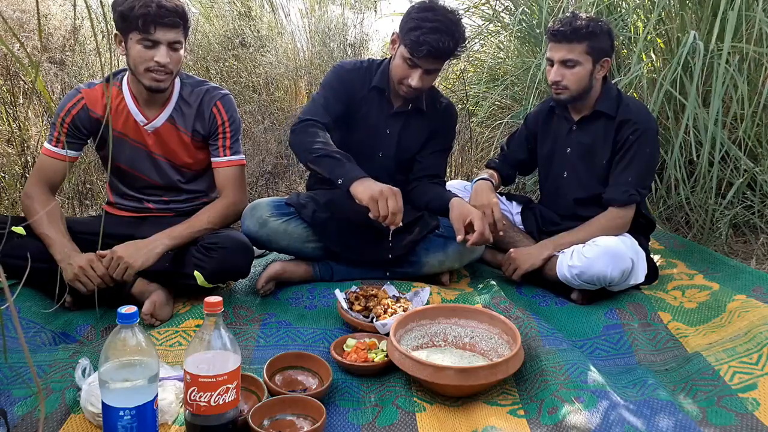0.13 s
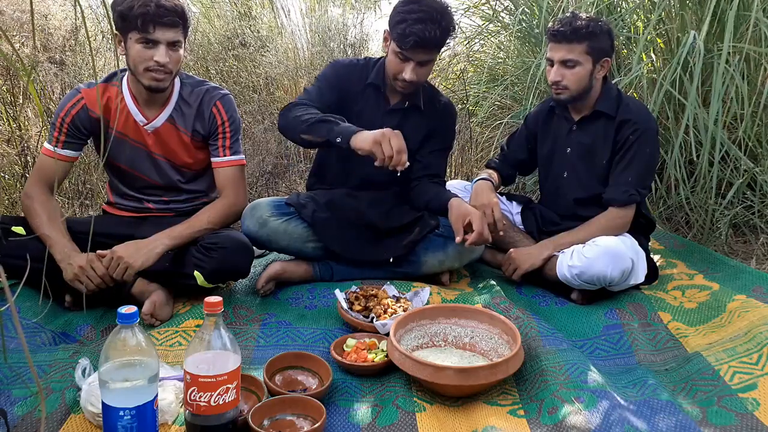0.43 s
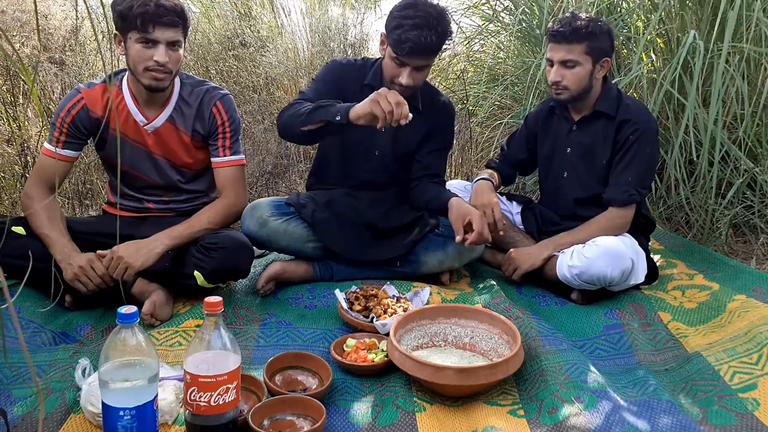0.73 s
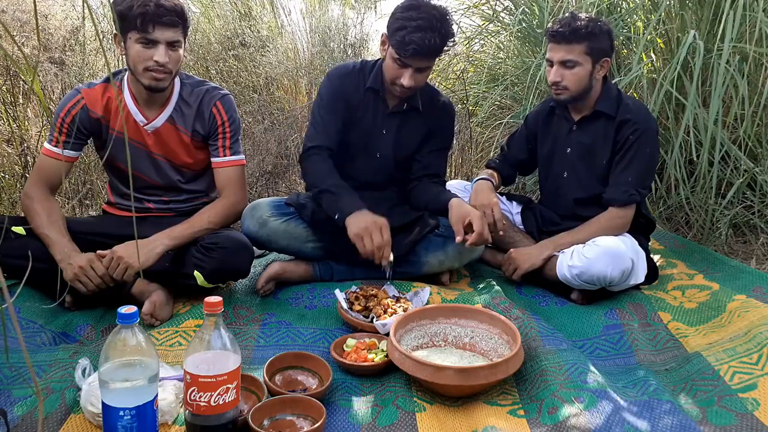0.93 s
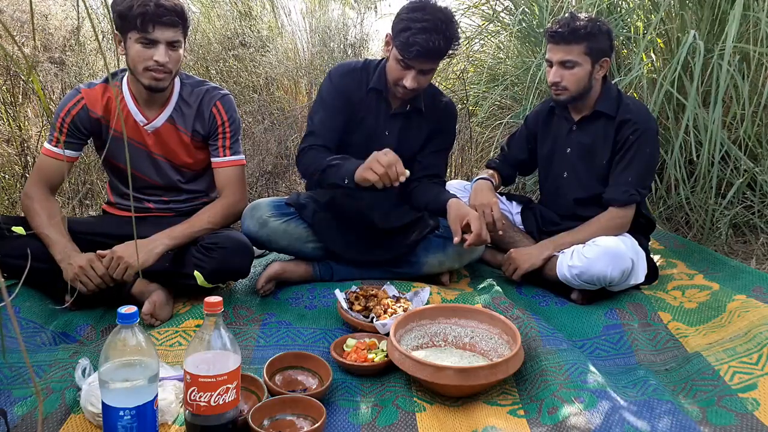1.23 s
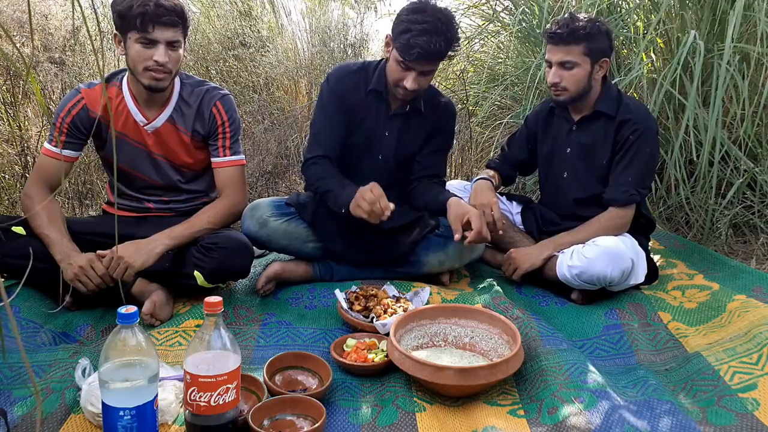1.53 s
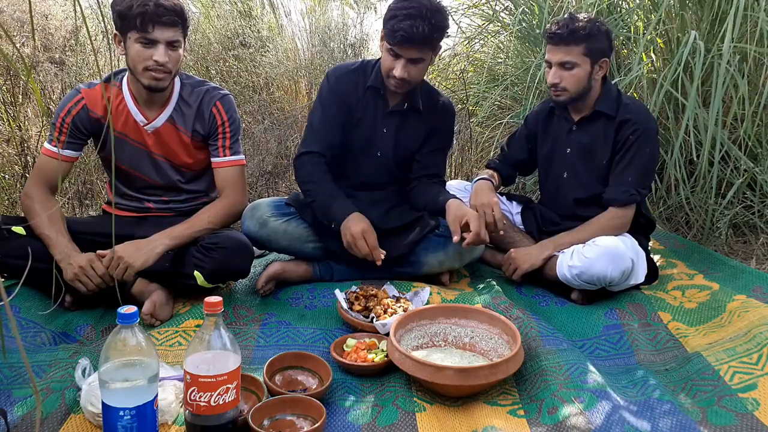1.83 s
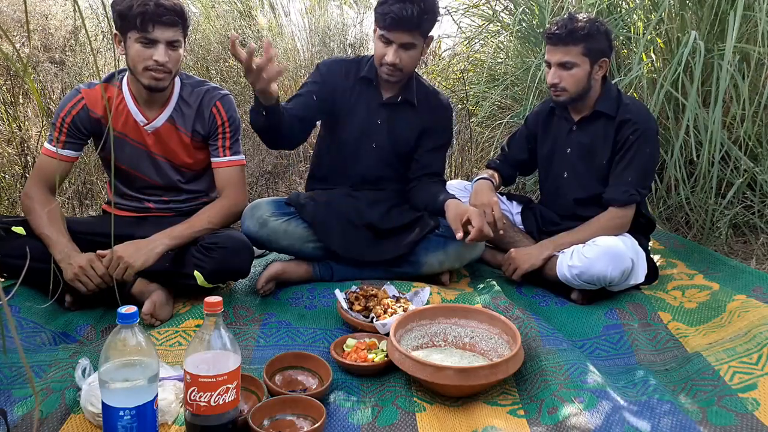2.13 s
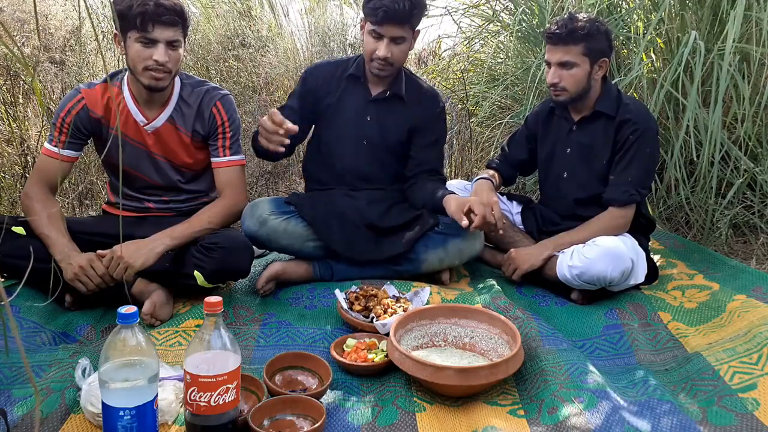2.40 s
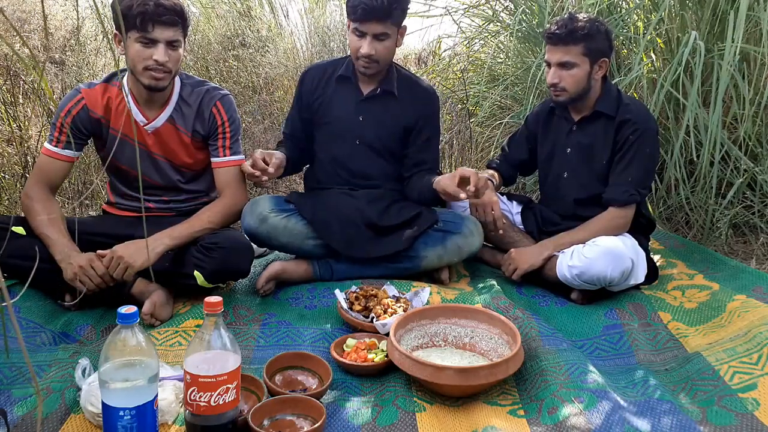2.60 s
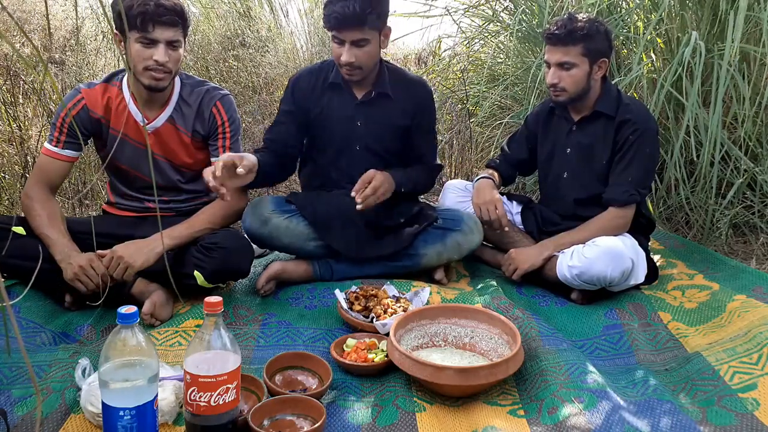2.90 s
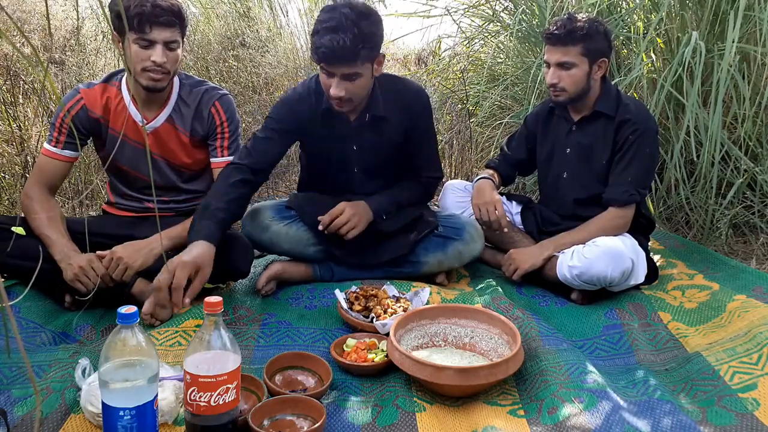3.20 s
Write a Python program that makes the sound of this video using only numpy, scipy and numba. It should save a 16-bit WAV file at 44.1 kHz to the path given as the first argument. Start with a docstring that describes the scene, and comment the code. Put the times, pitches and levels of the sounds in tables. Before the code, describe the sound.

A crow caws hoarsely right at the start, slightly to the right, for about half a second, dropping in pitch. It caws again from 2.3 to 2.7 seconds. Throughout, a distant engine chugs about seven times a second over a low rumble, and insects hiss thinly. Faint dry rustles come and go, with a soft low boom near 1 second and a small close tick at 2.9 seconds.

```python
"""A crow caws hoarsely in tall grass, a little to the right, and again two seconds later.
Its rattling partials and rasp ring the throat; the resonance rises as the beak opens.
Far off a single-cylinder engine fires about seven times a second: intake thump, exhaust bang, clatter,
and a faint knock at two firings. Insects hiss thinly.
Faint dry rustles, one soft low boom and a close tick come and go."""
import sys
import numpy as np
from scipy import signal
from scipy.fft import rfft, irfft, next_fast_len
from scipy.io import wavfile
from scipy.ndimage import uniform_filter1d
from numba import njit

SR = 44100
rng = np.random.default_rng(int(sys.argv[2]) if len(sys.argv) > 2 else 0)


def store_pcm(level_fs):
    """Save levels as 16-bit WAV."""
    pcm = np.round(np.clip(level_fs, -1, 1) * 32767).astype(np.int16)
    wavfile.write(sys.argv[1], SR, np.atleast_2d(pcm).T)


N = 147735
TIME = np.arange(N) / SR

# voice pitch, one list per caw (time [s], pitch [Hz])
CAW_PITCH = [
    [(0, 498.3), (.05, 516.6), (.11, 510.5), (.19, 492.6), (.25, 460), (.325, 440.9), (.375, 405.5),
     (.405, 347.4), (.435, 295)],
    [(2.27, 450), (2.34, 506.4), (2.41, 509.5), (2.46, 495.7), (2.52, 470.4), (2.6, 444), (2.66, 424),
     (2.7, 388.6), (2.745, 303.6)],
]
# vocal effort, one list per caw (time [s], relative level [dB])
CAW_EFFORT = [
    [(0, -38.5), (.045, -33), (.12, -31.5), (.2, -31.5), (.27, -34), (.32, -34), (.385, -36), (.41, -42.5),
     (.435, -56.5)],
    [(2.268, -67), (2.292, -47), (2.334, -37.5), (2.42, -32), (2.49, -32.5), (2.52, -33.5), (2.66, -35),
     (2.702, -38), (2.745, -55)],
]
# throat resonance, moved by the beak (time [s], centre [Hz])
BEAK_RESONANCE = [(0, 1760), (.05, 1930), (.2, 1840), (.36, 1870), (.4, 1710), (.43, 1575), (2.27, 1640),
                  (2.34, 1693), (2.48, 1923), (2.69, 1992), (2.745, 1600)]
# steady voice colour (frequency [Hz], gain [dB])
THROAT_COLOUR = [(350, -22), (500, -16), (700, -1), (850, -3), (1020, 1), (1130, -6), (1280, 1), (1500, -1),
                 (1700, -4), (2000, 1), (2480, 1), (2700, -9), (2880, -1), (3100, -8), (3500, -19),
                 (4600, 3), (7000, -8)]
# hiss in the open throat (frequency [Hz], gain [dB])
BREATH_COLOUR = [(2500, -8), (3600, -9.5), (4200, -5), (4650, 2), (5200, -6), (6300, -3.5), (8200, -9.5),
                 (9800, -20), (15000, -22.5)]
# engine cycles (time [s], relative bang level [dB], relative thump level [dB])
FIRINGS = [(0.0648, -34.5, -36.5), (0.2028, -39, -39), (0.3441, -35.5, -32), (0.4826, -41.5, -38),
           (0.6235, -38.5, -37.5), (0.7613, -39.5, -37), (0.9021, -40, -39.5), (1.0381, -37, -39),
           (1.1747, -38.5, -39.5), (1.3126, -40, -40), (1.4501, -40, -39), (1.5905, -39.5, -43.5),
           (1.7259, -39, -36.5), (1.864, -41, -39), (2.0049, -39.5, -40), (2.14, -42.5, -35),
           (2.2767, -40.5, -43.5), (2.4116, -33.5, -36), (2.5446, -35, -34.5), (2.678, -37.5, -35.5),
           (2.8071, -44.5, -39.5), (2.9402, -41.5, -41), (3.0748, -37.5, -37.5), (3.2071, -40, -39),
           (3.3419, -37.5, -44)]
# exhaust echoes (frequency [Hz], gain [dB])
ECHO_COLOUR = [(40, -23), (65, 8), (120, -9.5), (170, -13), (250, 6.5), (320, -9.5), (420, 1.5),
               (700, -7.5)]
# steady engine rumble (frequency [Hz], gain [dB])
RUMBLE_COLOUR = [(20, -11.5), (40, -20), (60, -1), (115, -1), (150, -7), (240, -10.5), (310, -10),
                 (400, -26.5), (550, -32.5), (1000, -52)]
# air and insect hiss (frequency [Hz], gain [dB])
HISS_COLOUR = [(260, -22), (450, -16.5), (623, -9.5), (802, -11), (851, -11.5), (1450, -12.5),
               (1540, -10.5), (1890, -14.5), (4030, -16), (5920, -14), (6760, -0.5), (7280, -8.5),
               (8080, -6), (9940, -14.5), (15500, -11.5)]
# insect song (centre [Hz], width [Hz], level [dB])
INSECT_BANDS = [(6784, 83, -70), (7940, 230, -75)]
# metal clatter (frequency [Hz], gain [dB])
CLATTER_COLOUR = [(500, -10), (1200, -4), (1700, 5), (2400, -2), (3400, -14), (5000, -13), (7000, -14),
                  (12000, -22)]
# engine knocks (the two rows below 2 kHz) and dry rustles (the rest)
# (time [s], half-width [s], level [dB], centre [Hz])
KNOCKS_AND_RUSTLES = [(0.89, 0.037, -66.5, 1690), (0.908, .025, -67, 5000), (0.934, 0.062, -68, 13500),
                      (1.03, 0.038, -70.5, 1600), (1.377, .04, -67, 13000), (2.142, 0.02, -62, 5970),
                      (2.975, 0.093, -64, 12700), (2.983, 0.15, -68.5, 5400)]
# low boom (frequency [Hz], level [dB])
BOOM_PARTIALS = [(112, -36.5), (230, -48)]
# close tick (frequency [Hz], gain [dB])
TICK_COLOUR = [(500, -14), (2600, -9), (3400, -14), (4300, 3), (5500, -8), (7000, -2), (10000, -11),
               (15000, -14)]

CROW_PAN_DB, CROW_LAG_S, FULL_EFFORT_DB = 2.5, .0001, -30
ENGINE_PAN_DB, ENGINE_LAG_S = 6.6, .0004


def from_db(db):
    """Decibels to gain."""
    return 10 ** (np.asarray(db) / 20)


def unit_rms(x):
    """Scale to unit power."""
    return x / np.sqrt(np.mean(x ** 2) + 1e-20)


def curve(rows):
    """Interpolate (time [s], value) rows at every sample."""
    return np.interp(TIME, *np.transpose(rows))


def colour(x, points):
    """Minimum-phase filter through (frequency [Hz], gain [dB]) points."""
    size = next_fast_len(N + SR // 2)
    hz, db = np.transpose(points)
    gain_db = np.interp(np.log(np.fft.rfftfreq(size, 1 / SR) + 1), np.log(hz), db)
    cepstrum = irfft(np.log(from_db(gain_db)), size)
    cepstrum[1:size // 2] *= 2
    cepstrum[size // 2 + 1:] = 0
    return irfft(rfft(x, size) * np.exp(rfft(cepstrum)), size)[..., :N]


def noise(points, shape=N):
    """Coloured noise, unit RMS."""
    return unit_rms(colour(rng.standard_normal(shape), points))


def drift(rate_hz):
    """Low-passed random wander, unit RMS."""
    r = np.exp(-2 * np.pi * rate_hz / SR)
    return unit_rms(signal.lfilter([1], [1, -2 * r, r * r], rng.standard_normal(N + SR))[SR:])


def resonance(x, hz, width_hz):
    """Two-pole band-pass."""
    r = np.exp(-np.pi * width_hz / SR)
    return signal.lfilter([1, 0, -1], [1, -2 * r * np.cos(2 * np.pi * hz / SR), r * r], x)


@njit
def moving_resonance(x, hz, width_hz):
    """Band-pass with per-sample centre and width."""
    y, r = np.zeros(len(x)), np.exp(-np.pi * width_hz / SR)
    for i in range(2, len(x)):
        feedback = 2 * r[i] * np.cos(2 * np.pi * hz[i] / SR) * y[i - 1] - r[i] ** 2 * y[i - 2]
        y[i] = (1 - r[i]) * (x[i] - x[i - 2]) + feedback
    return y


def echoes(x, t60_s, delay_s):
    """Dense, delayed, decaying reflections."""
    t = TIME[:SR]
    response = rng.standard_normal(SR) * from_db(-60 * t / t60_s) * (t > delay_s)
    return signal.fftconvolve(x, response / np.linalg.norm(response))[:N]


def place(x, pan_db, lag_s):
    """Mono to stereo, right side louder and later."""
    return np.array([x * from_db(-pan_db / 2), np.interp(TIME - lag_s, TIME, x) * from_db(pan_db / 2)])


def crow_source(pitch_hz, clear_hz=290, rough_hz=470, cycles_per_rattle=6.3):
    """Wavering partials plus pulsed rasp, and their rattle; the voice clears as pitch falls."""
    rough = np.clip((pitch_hz - clear_hz) / (rough_hz - clear_hz), 0, 1)
    rattle_hz = pitch_hz / cycles_per_rattle * (1 + .146 * drift(23.8))
    rattle = rough * np.cos(2 * np.pi * np.cumsum(rattle_hz) / SR)
    jitter = .013 * rough * drift(157)
    cycles = np.cumsum(pitch_hz * (1 + jitter + .042 * rattle)) / SR
    partials = np.zeros(N)
    for k in range(1, 13):
        phase_rad = 2 * np.pi * (k * cycles + rng.random())
        wander_rad = np.sqrt(k) * .54 * rough * drift(132)
        flutter_db = 3 * rough * drift(74)
        partials += np.cos(phase_rad + wander_rad) * from_db(flutter_db)
    rasp = .45 * rough * rng.standard_normal(N) * (1 + np.cos(2 * np.pi * cycles))
    return unit_rms(partials) + rasp, rattle


def crow(voice_gain_db=2, breath_db=-47):
    """Voice and breath through the throat; its resonance narrows as the call weakens."""
    source, rattle = crow_source(curve(CAW_PITCH[0] + CAW_PITCH[1]))
    effort_db = curve(CAW_EFFORT[0] + CAW_EFFORT[1])
    drive_db = effort_db - FULL_EFFORT_DB
    centre_hz = curve(BEAK_RESONANCE)
    width_hz = 1320 * from_db(.55 * np.minimum(drive_db, 0))
    voice = moving_resonance(source, centre_hz, width_hz)
    voice = colour(moving_resonance(voice, centre_hz, width_hz), THROAT_COLOUR)
    voice /= np.sqrt(uniform_filter1d(voice ** 2, size=400) + 1e-12)  # flatten the level
    swell = 1 + .3 * rattle
    voice *= swell * from_db(voice_gain_db + effort_db)
    turbulence = rng.standard_normal((2, N)) + .56 * rng.standard_normal(N)  # per side + shared
    breath = unit_rms(colour(turbulence * swell, BREATH_COLOUR)) * from_db(breath_db + .94 * drive_db)
    breath *= from_db([[-CROW_PAN_DB / 2], [CROW_PAN_DB / 2]])
    gate = sum(1.0 * (TIME >= caw[0][0]) * (TIME <= caw[-1][0]) for caw in CAW_EFFORT)
    return (place(voice, CROW_PAN_DB, CROW_LAG_S) + breath) * uniform_filter1d(gate, size=300)


def grass_scatter(call):
    """The call plus short scatter from the grass and a fainter tail from the field."""
    reflections = [from_db(-9) * echoes(side, t60_s=.05, delay_s=.0022)
                   + from_db(-21) * echoes(side, t60_s=.36, delay_s=.025) for side in call]
    return call + np.array(reflections)


def engine(intake_hz=91, intake_lead_s=.02783, intake_sigma_s=.006,
           bang_hz=135.4, bang_rise_s=.0038, bang_width_s=.0027, bang_gain_db=6.5):
    """Each cycle: soft intake thump, then an exhaust bang echoing over the fields. Rumble beneath."""
    thumps, bangs = np.zeros(N), np.zeros(N)
    for time_s, bang_db, thump_db in FIRINGS:
        t = TIME - time_s + intake_lead_s
        envelope = from_db(thump_db) * np.exp(-(t / intake_sigma_s) ** 2 / 2)
        thumps -= envelope * np.cos(2 * np.pi * intake_hz * t)
        t = TIME - time_s - bang_rise_s
        envelope = from_db(bang_db + bang_gain_db) * np.exp(-(t / bang_width_s) ** 2)
        bangs -= envelope * np.sin(2 * np.pi * bang_hz * t)
    roll = from_db(-1.5) * colour(echoes(bangs, t60_s=.36, delay_s=.019), ECHO_COLOUR)
    rumble = from_db(-53) * noise(RUMBLE_COLOUR)
    diffuse = from_db(-63.5) * noise(RUMBLE_COLOUR, (2, N))
    sound = place(thumps + bangs + roll + rumble, ENGINE_PAN_DB, ENGINE_LAG_S) + diffuse
    return signal.sosfilt(signal.butter(2, 32.7, "high", fs=SR, output="sos"), sound)


def insects(hiss_db=-61.5, waver_db=.83):
    """Wide, faint hiss with narrow bands of insect song."""
    out = from_db(hiss_db + waver_db * drift(4)) * noise(HISS_COLOUR, (2, N))
    for hz, width_hz, db in INSECT_BANDS:
        band = resonance(rng.standard_normal((2, N)), hz, width_hz)
        out += from_db(db) * unit_rms(resonance(band, hz, width_hz))
    return out


def clatter(level_db=-71, spread_db=5.5, lead_s=.0043, half_width_s=.024):
    """The engine's metal parts clatter faintly at each firing."""
    bursts = np.zeros(N)
    for time_s, _, _ in FIRINGS:
        gain = from_db(level_db + spread_db * rng.standard_normal())
        bursts += gain * np.exp(-((TIME - time_s + lead_s) / half_width_s) ** 2)
    return place(bursts * noise(CLATTER_COLOUR), ENGINE_PAN_DB, ENGINE_LAG_S)


def knocks_and_rustles():
    """Short grainy swells: faint engine knocks at two firings, and higher dry rustles."""
    out = np.zeros((2, N))
    for time_s, half_width_s, db, hz in KNOCKS_AND_RUSTLES:
        band = resonance(rng.standard_normal((2, N)), hz, width_hz=hz / 2)
        grain = unit_rms(band * from_db(drift(140)))
        out += from_db(db) * grain * np.exp(-((TIME - time_s) / half_width_s) ** 2)
    return out


def boom(time_s=1.05, half_width_s=.019):
    """Two low partials swell and fade briefly."""
    hum = sum(from_db(db) * np.sin(2 * np.pi * (hz * TIME + rng.random())) for hz, db in BOOM_PARTIALS)
    return place(hum * np.exp(-((TIME - time_s) / half_width_s) ** 2), ENGINE_PAN_DB, ENGINE_LAG_S)


def tick(time_s=2.918, decay_s=.003, level_db=-46):
    """One small, bright, fast-decaying noise burst."""
    envelope = (TIME > time_s) * np.exp(-abs(TIME - time_s) / decay_s)
    return from_db(level_db) * envelope * noise(TICK_COLOUR, (2, N))


def scene():
    """Stereo sum of all sources."""
    return grass_scatter(crow()) + engine() + clatter() + boom() + insects() + knocks_and_rustles() + tick()


def record(dry):
    """Cut the deepest bass and, steeply, the top."""
    low_cut_hz, high_cut_hz = 22, 15800
    dry = signal.sosfilt(signal.butter(2, low_cut_hz, "high", fs=SR, output="sos"), dry)
    return signal.sosfilt(signal.ellip(12, .1, 80, high_cut_hz, fs=SR, output="sos"), dry)


dry = scene()
out = record(dry)
store_pcm(out)
```